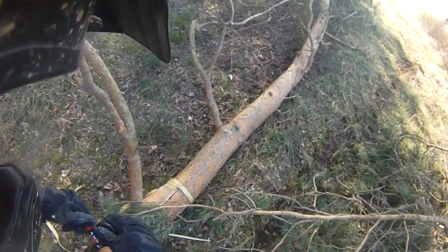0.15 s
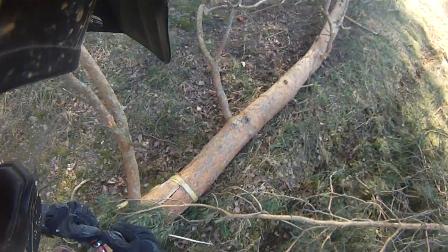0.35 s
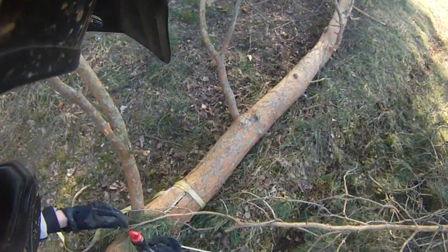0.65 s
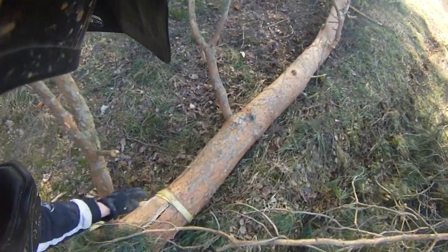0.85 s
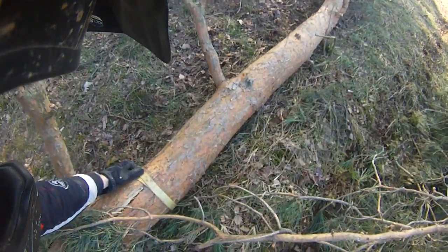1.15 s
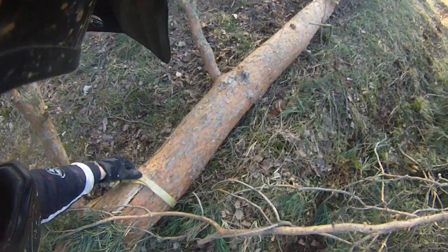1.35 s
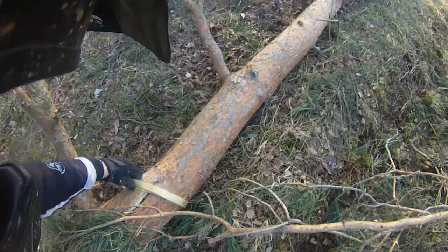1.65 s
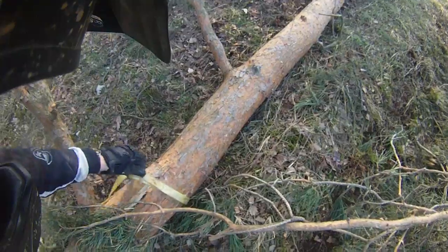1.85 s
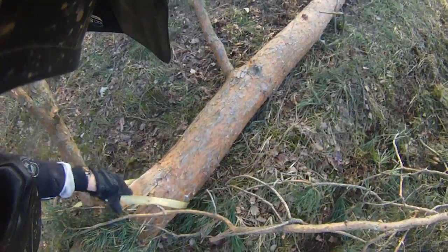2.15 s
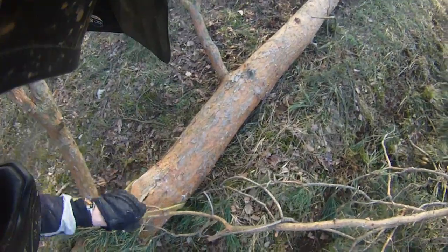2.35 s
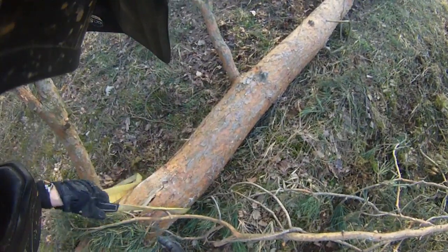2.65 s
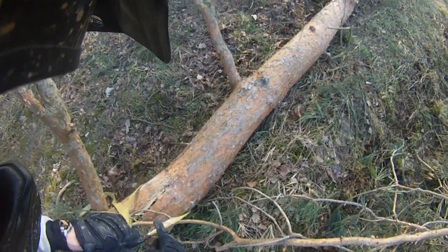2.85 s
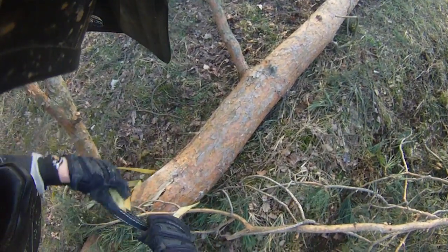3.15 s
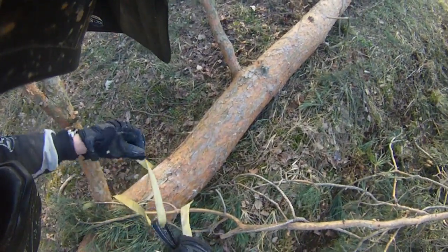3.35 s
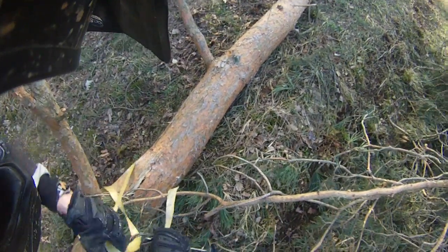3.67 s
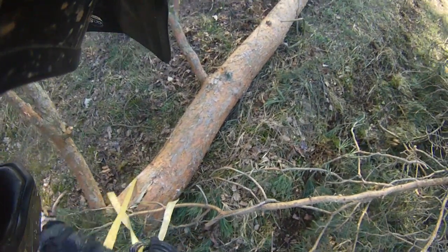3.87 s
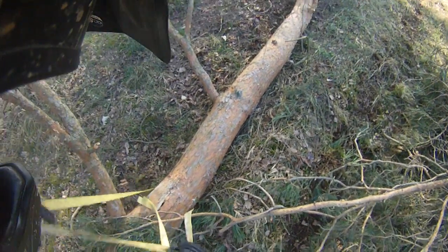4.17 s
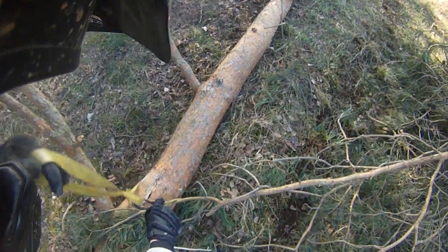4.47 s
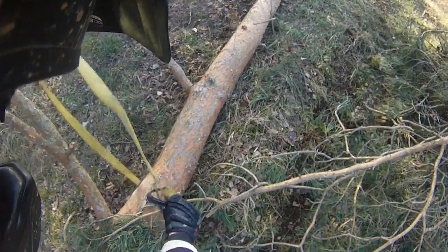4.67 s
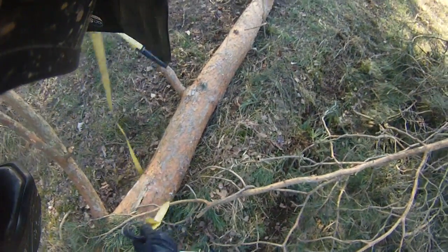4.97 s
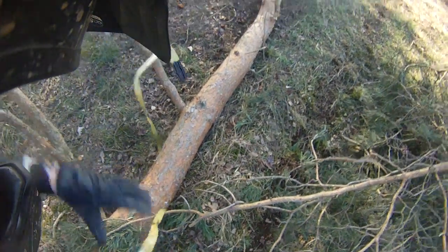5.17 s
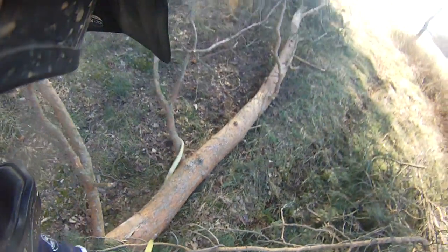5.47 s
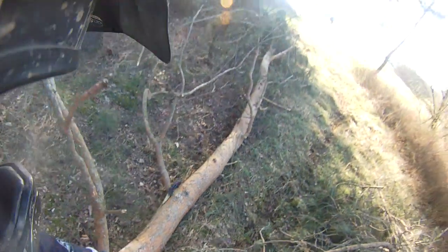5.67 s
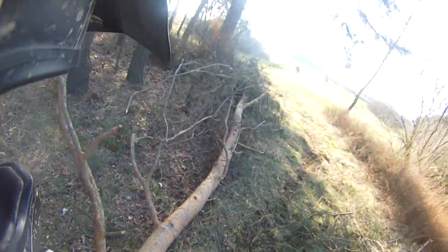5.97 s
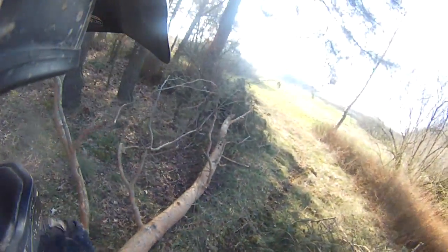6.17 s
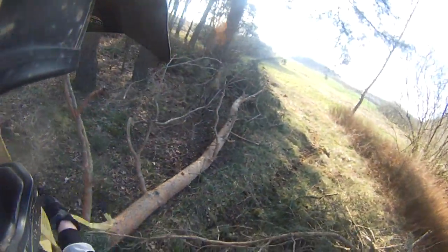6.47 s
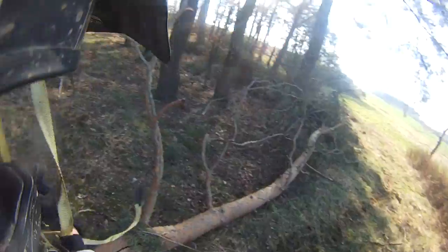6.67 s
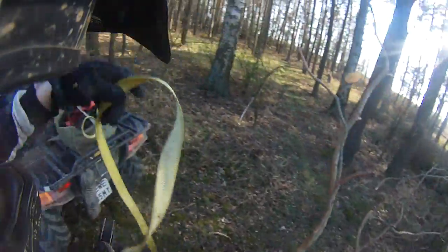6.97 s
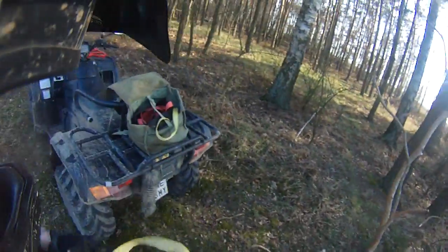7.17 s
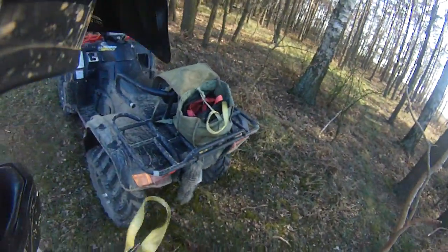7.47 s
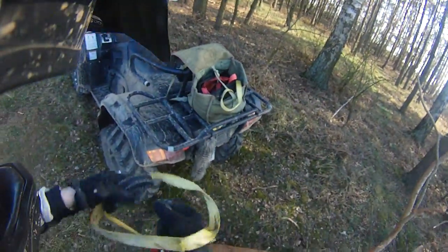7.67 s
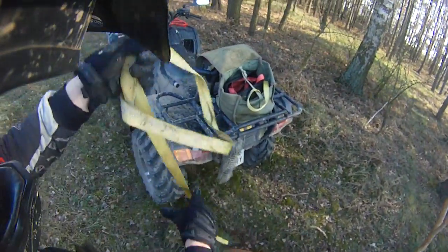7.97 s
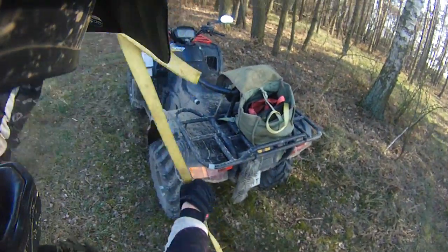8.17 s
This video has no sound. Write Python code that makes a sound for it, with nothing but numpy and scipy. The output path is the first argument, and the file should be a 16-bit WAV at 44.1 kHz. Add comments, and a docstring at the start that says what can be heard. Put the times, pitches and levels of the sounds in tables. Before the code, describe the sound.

A single-cylinder quad bike idles throughout in a forest, heard from a microphone at the rider's helmet. Its quick, slightly wandering chug mixes low thumps, hollow barks, raspy gas and metallic valve clatter, with a thin, dull echo off the trunks. Right at the start a small steel hook pings close by, and cloth and strap rustle. Sharp exhaust pops cluster from 0.5 to 1 second, with swishes of webbing. Dry wood knocks lightly around 1.4. From 2 to 5 the engine is duller and quieter while the strap ticks and rubs, including a double tick near 4 and a knock at 4.8. A bright buckle snap comes at 5.3, then swishes. Pops return from 5.5, strongest near 6.9, when a hard dry knock also lands. Through 7 to 8.3 the exhaust booms and hisses, and the clatter grows nearer, over continued strap rustling.

```python
"""An idling single-cylinder quad bike is heard first, with a steel hook's ping close by in the opening instant.
Place: a forest. Microphone: one channel at the rider's helmet, as they unhook a tow strap and walk up to the bike.
Timed gas pulses thump and bark in a ringing silencer; noise gated by the crank makes rasp, hiss and valve clatter.
The clatter grows louder as the distance closes. Nearer still, gritty noise makes the strap rustle and swish,
short bursts tick, snap and knock like buckle, twigs and dry wood, and the trees return a thin echo of the bike."""
import sys
import numpy as np
from scipy import signal
from scipy.fft import rfft, irfft, next_fast_len
from scipy.io import wavfile
from scipy.ndimage import uniform_filter1d

SR = 44100
rng = np.random.default_rng(int(sys.argv[2]) if len(sys.argv) > 2 else 0)


def wrap_up_sound(samples):
    """Save the sound to the file named by the first command line argument, as 16-bit audio."""
    columns = np.atleast_2d(samples).T
    # keep every value between -1 and 1, then stretch to whole-number steps
    tamed = np.clip(columns, -1, 1)
    steps = np.round(tamed * 32767).astype(np.int16)
    wavfile.write(sys.argv[1], SR, steps)


N = 366912
TIME = np.arange(N) / SR  # s

# All spectra give relative density; each sound's loudness is set separately.
# faint steady hush of the place: [f/Hz, level/dB]
HUSH_SPECTRUM = [(20, 0), (35, -4), (60, 9), (300, -16), (2400, 12), (3200, -16.5), (5400, -16.5),
                 (7000, -12.5), (9000, -19), (15000, -20)]

# strap and sleeve rubbing, one row per arm move: [middle t/s, length t/s, level/dB]
RUBS = [(.04, 0.1, -51), (.68, .6, -57.5), (1.46, 0.63, -62.5), (2.55, 0.43, -63), (3.93, 0.35, -58),
        (4.62, .14, -62), (5.45, 0.39, -56.5), (6.33, 0.51, -55), (7.6, 1.5, -58)]
# strap and sleeve rustle: [f/Hz, level/dB]
RUSTLE_SPECTRUM = [(700, -13), (1800, 18.5), (3000, 5), (4500, -5), (5700, -5), (7200, 2), (9000, -7),
                   (13000, -10.5), (15500, -15)]
# webbing sliding fast through the glove: [middle t/s, length t/s, level/dB]
SWISHES = [(0.393, 0.11, -58.5), (0.838, 0.1, -54.5), (1.425, 0.15, -66), (3.35, 0.046, -57.5),
           (5.38, 0.046, -57), (5.543, 0.27, -63), (5.857, 0.2, -57)]
# sliding webbing: [f/Hz, level/dB]
SWISH_SPECTRUM = [(2000, 3), (3500, 2.5), (5500, -4), (7300, 9.5), (9000, 0.5), (13500, -2), (15500, -10)]
# clearest strap, buckle and twig ticks: [t/s, peak level/dB]
TICKS = [(.042, -44), (2.185, -40.5), (2.847, -48), (3.348, -49), (3.98, -37), (3.991, -36.5), (4.079, -45),
         (4.303, -46), (4.57, -39.5), (5.478, -34.5), (5.532, -40), (5.698, -43), (6.18, -40.5),
         (6.996, -41), (7.041, -36.5), (7.785, -38)]
# strap, buckle and twig tick: [f/Hz, level/dB]
TICK_SPECTRUM = [(700, 5), (2000, -17), (3200, 5), (5000, -9), (7200, 9), (9500, -5.5), (13500, -4),
                 (16000, -2.5)]
# dry wood knocking: [t/s, peak level/dB, tail decay t/s]
KNOCKS = [(1.383, -25.5, 0.0035), (1.391, -30.5, 0.0095), (1.4382, -27, 0.0041), (4.762, -33, 0.0061),
          (6.9063, -14, 0.00084)]
# dry wood: [f/Hz, level/dB]
KNOCK_SPECTRUM = [(300, -28), (900, -16), (1500, 6.5), (1900, 5), (2500, 1), (2850, -15.5), (3200, -27),
                  (4200, -49), (7000, -34), (14000, -61)]
# strap and buckle coming loose: [t/s, peak level/dB, tail decay t/s]
SNAPS = [(5.324, -16.5, 0.0016)]
# the buckle's sharp snap: [f/Hz, level/dB]
SNAP_SPECTRUM = [(800, -10), (1800, 7), (2400, 0), (3100, -13), (3700, -12), (4500, -18), (5700, -9),
                 (6400, -6), (7200, 5), (8300, -2), (9300, -15), (10500, -12), (13000, -17), (15500, -30)]
# modes of the steel hook: [f/Hz, level/dB re HOOK_DB, 60 dB decay t/s]
HOOK_MODES = [(3180, -7, 0.048), (6220, -8, 0.12), (7224, -4, 0.098), (7320, -0.5, 0.11),
              (15200, -21, 0.087)]

# idle speed, hunting a little: [t/s, crank speed/(revolutions a minute)]
IDLE_RPM = [(0.0, 1680.6), (0.14, 1763.0), (0.76, 1766.3), (1.05, 1718.8), (1.64, 1760.8), (1.8, 1676.3),
            (2.01, 1722.1), (3.02, 1689.2), (3.81, 1745.2), (4.22, 1716.2), (5.33, 1696.7), (5.86, 1764.7),
            (6.23, 1700.4), (7.11, 1762.0), (7.16, 1716.0), (7.76, 1778.8), (8.07, 1696.3), (8.32, 1758.4)]
# gas pulses of a cycle, two strong and one weak: [delay t/s, thump level/dB, bark level/dB, rasp level/dB]
STROKES = [(0, 0, 4, 7), (0.0118, -2, 5.5, 7.5), (0.0195, -15.5, -12, -6)]
# firings that bark and rasp harder than the rest: [t/s, extra level/dB]
HARD_FIRINGS = [(.71, 1), (.85, 3.5), (.98, 4), (1.33, 2.5), (1.67, 4.5), (2.79, 4.5), (3.98, 3), (4.05, 2),
                (4.54, 2.5), (5.39, 3), (5.94, 3), (7.12, 2.5), (7.87, 3)]
# firings with a sharp pop on the second pulse: [t/s, peak level/dB]
POPS = [(.1, -30), (.51, -26), (.58, -23), (.65, -23), (.71, -16.5), (.92, -21), (.99, -24), (1.33, -30),
        (5.47, -24.5), (6.37, -25.5), (6.85, -20.5), (6.92, -16.5), (7.13, -19), (7.54, -38)]
# tailpipe pop: [f/Hz, level/dB]
POP_SPECTRUM = [(300, -4), (700, -4), (1200, 15.5), (1700, -1), (2400, -35), (3000, -37), (6000, -59)]

# Level curves over time are references; fixed trims below set each layer against them.
# low exhaust thump: [t/s, level/dB]
THUMP_DB = [(0, -38), (.3, -37.5), (1.02, -34.5), (1.75, -35), (2.15, -38.5), (5.4, -38.5), (5.85, -40.5),
            (6.25, -37), (7.3, -38), (8.32, -36.5)]
# exhaust bark as the listener bends and turns; rasp, intake and drone follow it: [t/s, level/dB]
BARK_DB = [(0, -32.5), (.45, -35), (.9, -34), (2.1, -39.5), (3.8, -40), (4.08, -36), (4.75, -36.5),
           (5.5, -35.5), (6.8, -35), (7.95, -31), (8.32, -31.5)]
# silencer box boom, strong only behind the bike: [t/s, level/dB]
BOOM_DB = [(0, -35.5), (1.25, -44), (3.5, -49), (5.1, -48), (5.8, -36), (6.6, -36), (8.32, -32.5)]
# tailpipe hiss, which beams to the rear: [t/s, level/dB]
HISS_DB = [(0, -61.5), (2.2, -73), (5, -67.5), (6.3, -75), (7.5, -56.5), (8.32, -59.5)]
# how openly the engine block is heard; clatter, tappets, buzz and whine follow it: [t/s, level/dB]
BLOCK_DB = [(0, -45.5), (.7, -40.5), (1.15, -43.8), (2.15, -47.5), (3.7, -48.5), (5.05, -48.5), (5.85, -46),
            (6.3, -39), (6.7, -39.8), (7.55, -34), (8.32, -34)]

# low gas thump: [f/Hz, level/dB]
THUMP_SPECTRUM = [(20, -68), (29, -44), (43, -27), (57, -3.5), (72, -0.5), (100, 0.5), (115, 4), (160, 1.5),
                  (210, 3.5), (290, -33.5), (600, -75), (1200, -99)]
# exhaust bark: [f/Hz, level/dB]
BARK_SPECTRUM = [(40, -40), (60, -7), (150, -42), (260, -9), (350, 1), (480, -3.5), (620, 0), (780, -8.5),
                 (950, -24), (1200, -24.5), (2000, -31.5), (2600, -74), (3300, -135)]
# silencer box boom, which carries mostly to the rear: [f/Hz, level/dB]
BOOM_SPECTRUM = [(140, -85), (210, 5.5), (250, 16), (300, 13.5), (370, 1), (520, -62)]
# turbulent rasp dragged along by the gas: [f/Hz, level/dB]
RASP_SPECTRUM = [(100, -30), (250, -2), (450, 7.5), (700, -5), (950, 2.5), (1300, -3.5), (1800, -37),
                 (2500, -17), (3000, -32), (4300, -39), (9000, -66)]
# tailpipe hiss: [f/Hz, level/dB]
HISS_SPECTRUM = [(2000, -27), (3500, 4), (4300, -8), (5000, 0.5), (5600, -4), (6400, 8), (7600, 3.5),
                 (9000, -9.5), (13000, -12), (15500, -27)]
# casing drone: [f/Hz, level/dB]
DRONE_SPECTRUM = [(25, -35), (50, -3), (90, -16), (180, -13), (270, -11.5), (340, 4), (425, 2), (520, -0.5),
                  (720, -2.5), (950, -13.5), (1500, -15), (3000, -56)]
# valve clatter: [f/Hz, level/dB]
CLATTER_SPECTRUM = [(200, -21), (500, -16), (750, -12.5), (930, 1), (1120, 4.5), (1370, 1), (1700, 1.5),
                    (2100, -7), (2480, -9), (2900, -28), (4300, -36.5), (7000, -53), (9500, -48),
                    (15000, -56)]
# loose heat shield buzz: [f/Hz, level/dB]
SHIELD_SPECTRUM = [(1200, -43), (1700, 0.5), (2100, -3), (2420, -1), (2700, -12.5), (3000, -23),
                   (5000, -35)]
# silencer and casing resonances: [f/Hz, width f/Hz, level/dB]
SILENCER_MODES = [(114.8, 25, -4.5), (154.4, 5.9, -11.5), (207, 23, -29.5), (240, 38, -12), (324, 15, -17),
                  (415, 54, -4.5), (570, 24, -13), (787, 33, -17)]
# valve noise through one cycle: [share of the cycle after the first pulse, level/dB]
VALVE_CYCLE = [(0, -5.5), (.08, -5), (.17, 0), (.3, -7.5), (.45, -6.5), (.6, -10), (.75, -4.5), (.88, -5),
               (1, -1.5)]
# what the tappets ring in the cylinder head: [f/Hz, width f/Hz of each of two passes, level/dB]
HEAD_MODES = [(2422, 100, 2), (6570, 300, -6.5), (7380, 400, -10.5)]

RUB_REST_DB = -68  # clothing never lies quite still
SMALL_TICKS_PER_S, SMALL_TICK_DB, SMALL_TICK_SPREAD_DB = 1.5, -47.5, 0.5
HOOK_S, HOOK_DB = .041, -38.5
FIRST_FIRING_S = .0212
WHINE_HZ, WHINE_WIDTH_HZ = 1217.5, 112  # width of each of two passes
WHINE_DB, WHINE_FOLLOW = -15.5, 0.82  # the whine follows the block's level only in part
TAPPET_DB, TAPPET_SPREAD_DB = -23.5, 7.5  # level re the block, and spread from tick to tick
LOW_CUT_HZ, EDGE_HZ = 12, 15300
BURST_LEAD_S = .002  # silence before the crack in each burst


def amp(db):
    """Decibels to an amplitude factor."""
    return 10 ** (np.asarray(db) / 20)


def evened(x):
    """Scales to rms 1."""
    return x / np.sqrt(np.mean(x ** 2) + 1e-20)


def curve(rows, at=TIME):
    """Joins rows by straight lines."""
    return np.interp(at, *np.transpose(rows))


def colour(x, points, lag=0):
    """Gives x a spectrum; lag (radians) turns a plain peak into a suck followed by a push."""
    hz, db = np.transpose(points)
    size = next_fast_len(len(x) + 4096)
    f = np.fft.rfftfreq(size, 1 / SR)
    gain = amp(np.interp(np.log(f + 1), np.log(hz), db))
    return irfft(rfft(x, size) * np.exp(-1j * lag) * gain, size)[:len(x)]


def noise(points, gate=1):
    """Gated noise with a spectrum, rms 1."""
    return evened(colour(rng.standard_normal(N) * gate, points))


def ring(x, hz, width):
    """One resonance of gain 1."""
    r = np.exp(-np.pi * width / SR)
    return 2 * signal.lfilter([1 - r], [1, -r * np.exp(2j * np.pi * hz / SR)], x).real


def impulses(times, sizes):
    """One click of the given size at each time."""
    out = np.zeros(N)
    inside = (times >= 0) & (times < TIME[-1])
    np.add.at(out, (times[inside] * SR).astype(int), sizes[inside])
    return out


def grain(per_s, size_db):
    """A random train of tiny contacts, a few of them large."""
    contacts = rng.random(N) < per_s / SR
    return contacts * amp(size_db * np.minimum(rng.exponential(1, N), 4))


def puffs(clicks, lead, decay):
    """Turns clicks into envelopes that start lead seconds before them, swell and die away."""
    u = np.arange(SR // 20) / SR / decay
    return signal.oaconvolve(clicks, u * np.exp(-u))[int(abs(lead) * SR):][:N]


def swells(rows):
    """Each move of the hand swells and fades as a bell curve."""
    return sum(amp(db) * np.exp(-(2 * (TIME - s) / length) ** 2) for s, length, db in rows)


def burst(points, decay, grit):
    """A click with a gritty dying tail, coloured and scaled to peak 1."""
    t = (np.arange(SR // 10) - SR // 500) / SR
    tail = grit * rng.standard_normal(len(t)) * (t >= 0) * np.exp(-abs(t) / decay)
    crack = colour((t == 0) + tail, points)
    return crack / abs(crack).max()


def add(mix, s, sound):
    """Lays a sound into the mix from s seconds on."""
    part = mix[max(round(s * SR), 0):][:len(sound)]
    part += sound[:len(part)]


def hush():
    """The faint, steady background of the place, as shaped noise."""
    return amp(-60) * noise(HUSH_SPECTRUM)


def forest(x, t60=0.09, wet_db=-19):
    """Trunks scatter a thin, dull echo: sparse random reflections from 12 ms on."""
    t = np.arange(SR // 2) / SR
    sparse = rng.random(len(t)) < 2000 / SR
    taps = rng.standard_normal(len(t)) * sparse * (t > .012) * amp(-60 * t / t60)
    taps = colour(taps, [(60, -21), (300, 3.0), (2000, -5), (10000, 2.5)])
    return x + amp(wet_db) * signal.oaconvolve(x, taps / np.linalg.norm(taps))[:N]


def rubbing():
    """Strap and sleeve rub, and webbing slides, in thousands of tiny slips a second."""
    rustle = noise(RUSTLE_SPECTRUM, grain(per_s=6400, size_db=2.0))
    swish = noise(SWISH_SPECTRUM, grain(per_s=9500, size_db=2.0))
    return (amp(RUB_REST_DB) + swells(RUBS)) * rustle + swells(SWISHES) * swish


def contacts():
    """Wood knocks, the buckle snaps, buckle and twigs tick: short impacts with gritty tails."""
    out = np.zeros(N)
    for s, db, decay in KNOCKS:
        add(out, s - BURST_LEAD_S, amp(db) * burst(KNOCK_SPECTRUM, decay, grit=0.65))
    for s, db, decay in SNAPS:
        add(out, s - BURST_LEAD_S, amp(db) * burst(SNAP_SPECTRUM, decay, grit=0.15))
    s, db = np.transpose(TICKS)
    small = amp(SMALL_TICK_DB) * grain(SMALL_TICKS_PER_S, SMALL_TICK_SPREAD_DB)
    ticks = impulses(s, amp(db)) + small
    for at in np.flatnonzero(ticks):
        add(out, at / SR - BURST_LEAD_S, ticks[at] * burst(TICK_SPECTRUM, decay=0.0037, grit=1.0))
    return out


def hook():
    """The steel hook pings once: a few modes, each dying at its own rate."""
    out = np.zeros(N)
    t = np.arange(SR // 4) / SR
    ping = sum(amp(db - 60 * t / t60) * np.sin(2 * np.pi * hz * t) for hz, db, t60 in HOOK_MODES)
    add(out, HOOK_S, amp(HOOK_DB) * ping)
    return out


def handling():
    """Everything at the hands, close to the microphone."""
    return rubbing() + contacts() + hook()


def cycles():
    """Four-stroke cycles since the first firing, two turns of the crank each."""
    done = np.cumsum(curve(IDLE_RPM)) / (2 * 60 * SR)
    return done - np.interp(FIRST_FIRING_S, TIME, done)


def firings():
    """The moment of each cycle's first pulse."""
    done = cycles()
    return np.interp(np.arange(done[-1]), done, TIME)


def strokes():
    """Click trains for thump, bark and rasp; the thump is steady, but no two firings burn alike."""
    thump_spread_db, bark_spread_db, rasp_spread_db, jitter_s = .3, 1.1, 2, .00012
    starts = firings()
    extra_db = np.zeros(len(starts))
    for when, db in HARD_FIRINGS:
        extra_db[np.argmin(abs(starts - when))] += db
    thump, bark, rasp = np.zeros((3, N))
    for delay, thump_db, bark_db, rasp_db in STROKES:
        a, b, c, d = rng.standard_normal((len(starts), 4)).T
        at = starts + delay + jitter_s * d
        thump += impulses(at, amp(thump_db + thump_spread_db * a))
        bark += impulses(at, amp(bark_db + bark_spread_db * b + extra_db))
        rasp += impulses(at, amp(rasp_db + rasp_spread_db * c + extra_db))
    return thump, bark, rasp


def intake(hz=425, length=.026):
    """The air box hoots for about eleven swings, ending at each cycle's first pulse; rms 1."""
    t = np.arange(0, length, 1 / SR)
    hoot = np.sin(2 * np.pi * hz * t) * np.sin(np.pi * (t / length) ** 2)
    starts = firings() - length
    return evened(signal.oaconvolve(impulses(starts, np.ones(len(starts))), hoot)[:N])


def tappets():
    """Two uneven metallic ticks a cycle ring the cylinder head near the two strong pulses."""
    scatter_s = .002
    at = np.concatenate([firings() + delay for delay, *_ in STROKES[:2]])
    shift, size = rng.standard_normal((len(at), 2)).T
    clicks = impulses(at + scatter_s * shift, amp(TAPPET_SPREAD_DB * size))
    head = sum(amp(db) * evened(ring(ring(clicks, hz, width), hz, width)) for hz, width, db in HEAD_MODES)
    return amp(curve(BLOCK_DB) + TAPPET_DB) * evened(head)


def machinery(rasp):
    """Valve gear clatters in step with the crank; casing drones and whines, a heat shield buzzes."""
    block = amp(curve(BLOCK_DB))
    valves = amp(curve(VALVE_CYCLE, cycles() % 1))
    # the buzz, like the whine, follows the block's level only in part
    buzz = amp(-24.5) * block ** 0.76 * noise(SHIELD_SPECTRUM, puffs(rasp, lead=0.0022, decay=0.0026))
    drone = amp(curve(BARK_DB) - 4.5) * noise(DRONE_SPECTRUM, valves)
    drone += amp(curve(BOOM_DB) - 10) * noise(BOOM_SPECTRUM, valves)
    clatter = amp(-2.0) * block * noise(CLATTER_SPECTRUM, valves * grain(per_s=3000, size_db=0.5))
    casing = rng.standard_normal(N) * valves
    for _ in range(2):
        casing = ring(casing, WHINE_HZ, WHINE_WIDTH_HZ)
    whine = amp(WHINE_DB) * block ** WHINE_FOLLOW * evened(casing)
    return buzz + drone + clatter + whine


def pops():
    """Uneven combustion now and then cracks out of the tailpipe with the second pulse."""
    out = np.zeros(N)
    pulses = firings() + STROKES[1][0]
    for s, db in POPS:
        nearest = pulses[np.argmin(abs(pulses - s))]
        add(out, nearest - BURST_LEAD_S, amp(db) * burst(POP_SPECTRUM, decay=0.00044, grit=0.095))
    return out


def exhaust(thump, bark, rasp):
    """Gas pulses ring the silencer and drag turbulence along."""
    bark_gain = amp(curve(BARK_DB))
    # the cylinder sucks before it pushes
    thumps = colour(thump, THUMP_SPECTRUM, lag=.95)
    # the bark bounces once inside the silencer, 2.3 ms later
    bounced = bark + .4 * np.roll(bark, round(.0023 * SR))
    barks = colour(bounced, BARK_SPECTRUM, lag=.3)
    pulses = amp(curve(THUMP_DB) - .5) * evened(thumps) + amp(-4.5) * bark_gain * evened(barks)
    pulses += amp(curve(BOOM_DB) - 5.0) * evened(colour(bark, BOOM_SPECTRUM))
    pipe = pulses + sum(amp(db) * ring(pulses, hz, width) for hz, width, db in SILENCER_MODES)
    gas = amp(-15.0) * bark_gain * noise(RASP_SPECTRUM, puffs(rasp, lead=0.0029, decay=0.0014))
    # the hiss never quite stops between puffs; its edges are smoothed over 150 samples
    flow = 0.15 + uniform_filter1d(puffs(rasp, lead=0.0029, decay=0.0024), size=150)
    hiss = amp(curve(HISS_DB)) * noise(HISS_SPECTRUM, flow)
    return pipe + gas + hiss


def engine():
    """Exhaust, air intake and moving parts, all timed by the crank."""
    thump, bark, rasp = strokes()
    air = amp(curve(BARK_DB) - 11.5) * intake()
    return exhaust(thump, bark, rasp) + air + machinery(rasp) + tappets()


def scene():
    """A faint steady hush, handling close by, and the engine among the trees."""
    bike = forest(engine() + pops(), wet_db=-24.5)
    return (hush() + handling() + bike)[None]


def record(dry):
    """The microphone channel's low cut and upper band limit."""
    low_cut = signal.butter(1, LOW_CUT_HZ, "highpass", fs=SR, output="sos")
    cut = signal.sosfilt(low_cut, dry)
    band_limit = signal.firwin(511, EDGE_HZ, window=("kaiser", 9), fs=SR)
    return signal.oaconvolve(cut, band_limit[None], "same")


dry = scene()
out = record(dry)
wrap_up_sound(out)
```